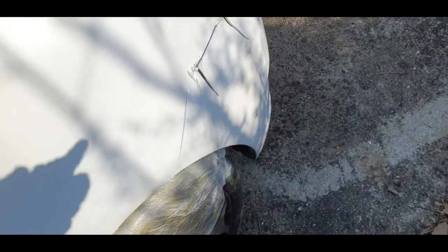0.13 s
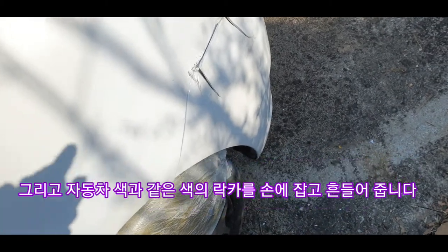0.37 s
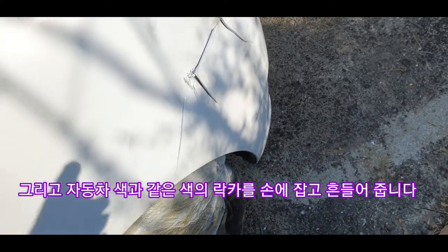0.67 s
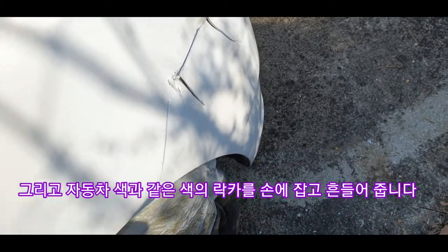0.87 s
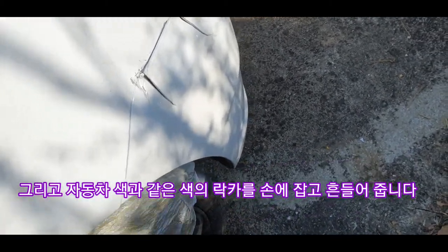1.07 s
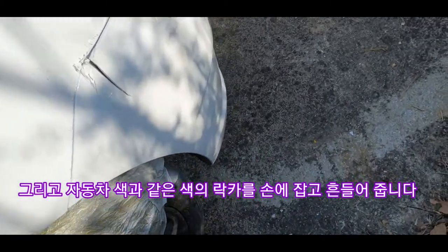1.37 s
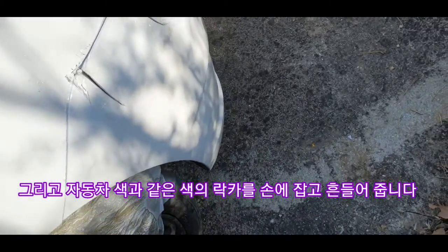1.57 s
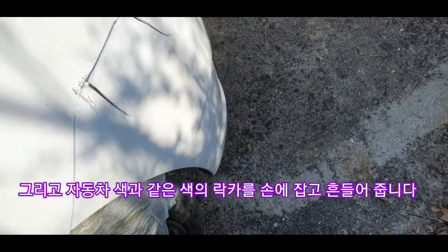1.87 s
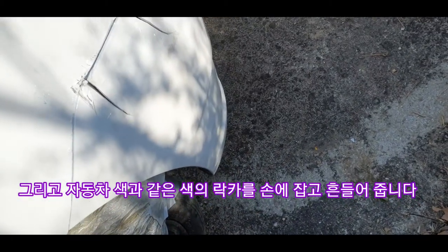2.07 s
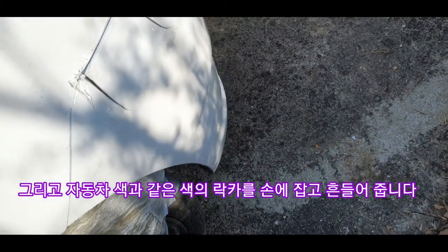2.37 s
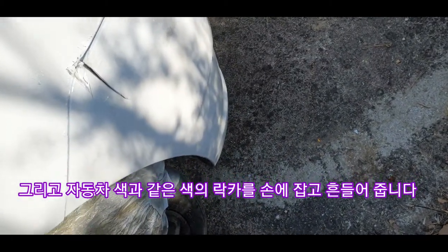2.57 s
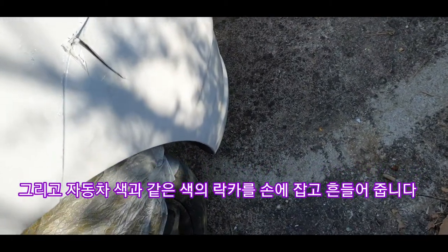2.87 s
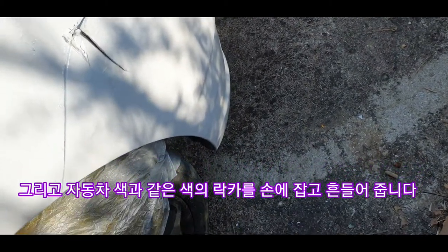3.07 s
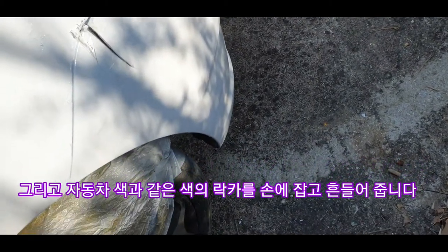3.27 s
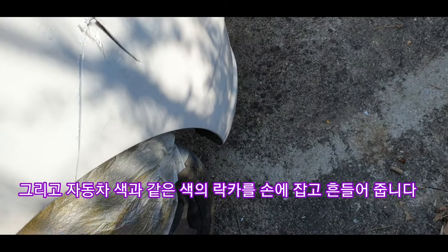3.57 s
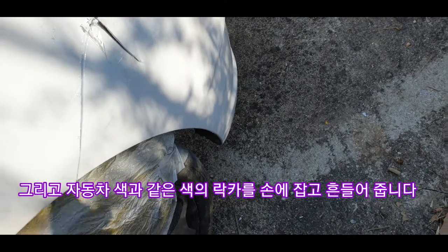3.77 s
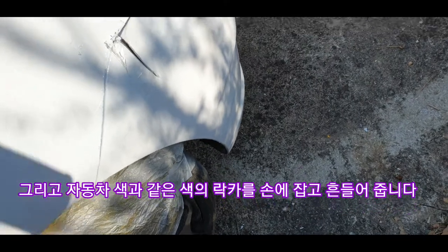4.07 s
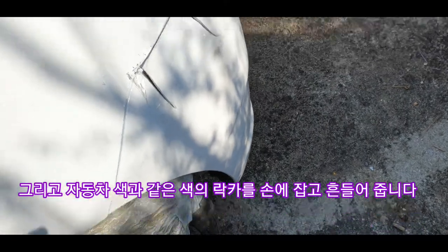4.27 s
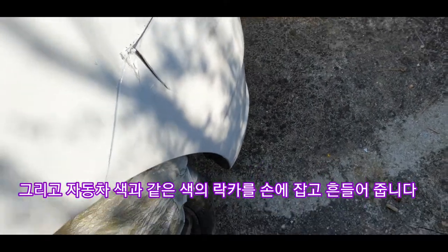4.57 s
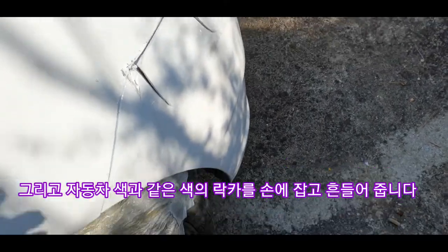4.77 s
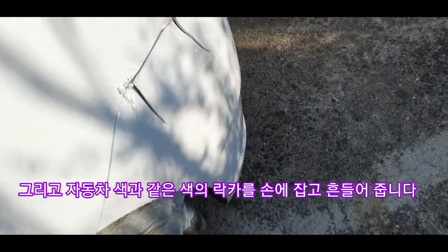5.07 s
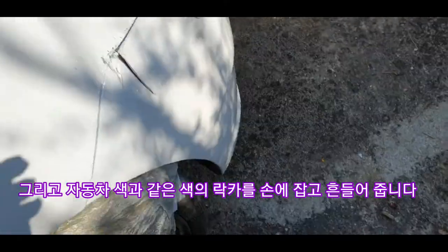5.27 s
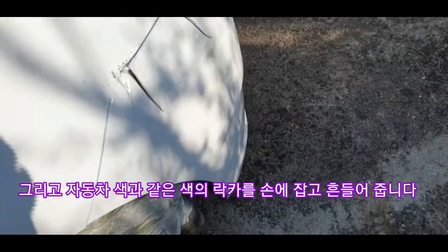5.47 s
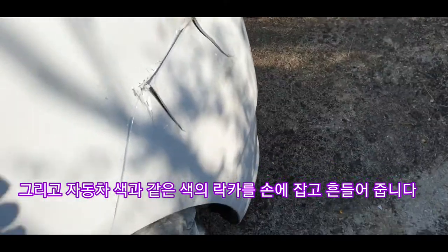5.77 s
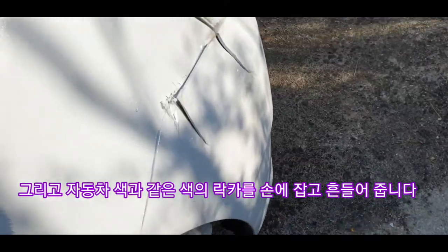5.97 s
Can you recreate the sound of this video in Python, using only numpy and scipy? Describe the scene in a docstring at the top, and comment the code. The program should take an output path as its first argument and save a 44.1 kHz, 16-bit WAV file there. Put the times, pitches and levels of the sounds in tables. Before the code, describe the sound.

A spray paint can is handled outdoors, close to the microphone and slightly to the right. For the first 1.4 seconds its mixing ball knocks loosely against the tin in scattered metallic clinks, the clearest at about 0.4 seconds. From 1.4 to 3.2 seconds come seven short, evenly paced sprays, each a bright hiss lasting a fifth of a second or less. After a brief lull, the can is shaken hard from about 3.9 seconds until the end, just past 6 seconds. The ball rattles in fast, uneven clusters of sharp clicks, louder than the sprays, with faint paint sloshing and sleeve rustle underneath. Wind buffets the microphone throughout as a low, uneven rumble with dull thumps, strongest near 2.9 and 4.5 seconds. The outdoor background is otherwise very quiet.

```python
"""Outdoors by a car panel, a spray paint can in the right hand. Its mixing ball knocks the tin,
seven short test sprays hiss from the nozzle and reflect off the panel, then the can is shaken hard.
Sleeve and paint rustle with the motion; gusts buffet and thump both microphone ports.
The right port faces the can; the left hears it later and duller."""
import sys
import numpy as np
from scipy import signal
from scipy.fft import rfft, irfft, next_fast_len
from scipy.io import wavfile
from scipy.ndimage import uniform_filter1d, map_coordinates

SR = 44100
rng = np.random.default_rng(int(sys.argv[2]) if len(sys.argv) > 2 else 0)


def output_pcm(signal):
    """Save a mono or channel-first signal as 16-bit PCM at the path in sys.argv[1].

    Samples are clipped to [-1, 1] before scaling.
    """
    pcm = np.clip(np.atleast_2d(signal).T, -1, 1) * 32767
    wavfile.write(sys.argv[1], SR, np.round(pcm).astype(np.int16))


N = 270244


def amp(db):
    return 10 ** (np.asarray(db) / 20)


def unit_rms(x):
    return x / np.sqrt(np.mean(x ** 2, axis=-1, keepdims=True) + 1e-20)


def at_hz(points, hz):
    """Interpolate (Hz, value) points on a log axis."""
    point_hz, values = np.transpose(points)
    return np.interp(np.log(hz + 1), np.log(point_hz + 1), values)


def curves(rows):
    """One value per sample for each column after the time."""
    times_s, *columns = np.transpose(rows)
    return [np.interp(np.arange(N) / SR, times_s, column) for column in columns]


def wobble(knots_per_s):
    """Smooth random curve, computed every 16 samples."""
    knots = rng.standard_normal(int(N * knots_per_s / SR) + 4)
    coarse = map_coordinates(knots, [np.arange(N // 16 + 2) * 16 * knots_per_s / SR])
    return np.interp(np.arange(N) / 16, np.arange(len(coarse)), coarse)


def tent_db(peak_s, rise_db_per_s, fall_db_per_s):
    """Level climbing to 0 dB at peak_s, then sinking."""
    t = np.arange(N) / SR - peak_s
    return np.where(t < 0, rise_db_per_s * t, -fall_db_per_s * t)


def steady(x, span_s):
    """Even out the level over span_s."""
    power = np.abs(uniform_filter1d(x ** 2, max(int(span_s * SR), 1)))
    return x / np.sqrt(power + 0.077)


def filtered(x, response):
    """Apply a gain given as a function of Hz."""
    size = next_fast_len(x.shape[-1] + 4096)
    spectrum = rfft(x, size) * response(np.fft.rfftfreq(size, 1 / SR))
    return irfft(spectrum, size)[..., :x.shape[-1]]


def sides(pan_db):
    """Left and right gains of mean power 1; pan is left over right."""
    gains = amp(np.array([pan_db, -pan_db]) / 2)
    return gains / np.sqrt(np.mean(gains ** 2, axis=0))


def hiss(spectrum, shared, grain_db, grain_per_s):
    """Stereo noise of rms 1, partly shared by the ports, with a grainy level."""
    common, own = rng.standard_normal(N), rng.standard_normal((2, N))
    white = np.sqrt(shared) * common + np.sqrt(1 - shared) * own
    grainy = white * amp(grain_db * wobble(grain_per_s))
    band = [(spectrum[0][0] * .8, -60), *spectrum, (spectrum[-1][0] * 1.02, -90)]
    return unit_rms(filtered(grainy, lambda hz: amp(at_hz(band, hz))))


# Outdoor air. Each row: frequency in Hz, level in dB.
AIR_SPECTRUM = [(150, -40), (250, -6.5), (287, -5.5), (330, -6), (372, -5.5), (1010, -20.5),
                (6030, -29.5), (7680, -28), (9610, -21.5), (15600, -31)]


def air():
    """Faint, steady background noise."""
    return amp(-74) * hiss(AIR_SPECTRUM, shared=.087, grain_db=.55, grain_per_s=21)


# Single gusts on a port. Each row: start in seconds, level in dB, ring in Hz, pan in dB,
# surrounding buffet in dB, sharp edge in dB.
GUSTS = [(1.239, -23, 61, -26, -21.5, -73), (1.421, -21, 81, 19, -48, -93),
         (2.104, -21, 65.5, -1, -33.5, -74), (2.696, -21.5, 62, -25, -30, -52.5),
         (2.893, -23, 75, 20, -48.5, -57.5), (2.922, -7.5, 75, -13, -34, -45),
         (3.132, -14.5, 99, -21, -59, -53), (3.41, -18.5, 70.5, 13, -38.5, -57.5),
         (4.264, -16.5, 117, -29, -36.5, -32.5), (4.356, -14.5, 69, -16.5, -47, -73),
         (4.483, -3, 63, -43, -31, -29), (4.684, -10, 102, -25.5, -34, -31.5),
         (4.726, -13, 81, -35, -47.5, -66), (4.858, -15.5, 83, -21, -36, -49.5),
         (5.743, -17, 73, -14, -37.5, -54.5)]


def thumps():
    """A pressure drop at the port swings back and dies in a few cycles; a sharp gust adds a slap."""
    ring_t60_s, slap_t60_s, slap_hz = .066, .03, 207
    out, t = np.zeros((2, N + SR)), np.arange(SR // 8) / SR
    slap = -np.sin(2 * np.pi * slap_hz * t) * amp(-60 * t / slap_t60_s)
    envelope = amp(-60 * t / ring_t60_s) * (1 - np.exp(-t / .0048))
    for start_s, level_db, ring_hz, pan_db, _, edge_db in GUSTS:
        swing = -np.sin(2 * np.pi * ring_hz * t + .18) * envelope
        thump = amp(level_db) * swing + amp(edge_db + 9) * slap
        out[:, round(start_s * SR):][:, :len(t)] += sides(pan_db)[:, None] * thump
    return filtered(out[:, :N], lambda hz: hz ** 2 / (hz ** 2 + 35 ** 2))


# Wind at the ports. Each row: time in seconds, buffet in dB, edge over buffet in dB, pan in dB.
BREEZE = [(0, -24.5, -26, -31), (.06, -46.5, -19, 4), (.27, -38, -20, -4), (.43, -43, -17.5, -12),
          (.6, -42, -22.5, 3.5), (.8, -48.5, -14, 10), (.95, -36.5, -20.5, 7), (1.1, -50.5, -12.5, 9),
          (1.38, -39, -7, -8.5), (1.5, -48, -9, 20), (1.65, -56, -19, 3), (1.91, -41.5, -20, -16.5),
          (2.2, -52, -7.5, 0), (2.32, -42, -17.5, 10), (2.6, -57, -15, 20), (2.75, -56, -5, -6),
          (3.17, -35, -13.5, -8.5), (3.46, -54.5, -23, 9.5), (3.64, -49.5, -26, 24.5), (3.76, -76, -5, 0),
          (3.88, -42, -29, -11), (4.03, -56.5, -23, -9), (4.3, -41.5, -14, -20.5), (4.7, -40, -12, -4.5),
          (4.95, -45.5, -14, -17), (5.22, -50.5, -12, 9), (5.44, -50.5, -20, 12), (5.51, -61.5, -16.5, -4),
          (5.75, -57, -9, 0), (5.92, -81, -18, -7), (5.99, -44, -20, -23), (6.13, -57, -6.5, -19)]
# Low buffet and its sharp edge. Each row: frequency in Hz, level in dB.
BUFFET_SPECTRUM = [(12, -57), (20, -18.5), (45, 7), (65, 1), (97, -3.5), (160, -24.5), (210, -62),
                   (350, -120)]
EDGE_SPECTRUM = [(90, -30.5), (140, 7.5), (200, -4), (300, -14.5), (450, -27), (700, -61.5)]


def wind():
    """Wind strikes each port in separate lumps and swells round every thump; a sharper edge rides on it."""
    level_db, sharpness_db, pan_db = curves(BREEZE)
    lumps = np.array([wobble(22), wobble(24)])
    buffet = amp(3.8 * lumps) * hiss(BUFFET_SPECTRUM, shared=.039, grain_db=.84, grain_per_s=34)
    edge = amp(6.6 * lumps) * hiss(EDGE_SPECTRUM, shared=.047, grain_db=4.4, grain_per_s=60)
    buffet = steady(unit_rms(buffet), span_s=.16)
    edge = steady(unit_rms(edge), span_s=.048)
    veer_db = 11 * wobble(6.1)
    out = amp(level_db + 4.5) * sides(pan_db + veer_db) * (buffet + amp(sharpness_db) * edge)
    for start_s, _, _, gust_pan_db, buffet_db, edge_db in GUSTS:
        span = slice(round((start_s - .15) * SR), round((start_s + .15) * SR))
        swell = amp(tent_db(start_s + .012, 258, 258)[span]) * sides(gust_pan_db)[:, None]
        out[:, span] += swell * (amp(buffet_db) * buffet[:, span] + amp(edge_db) * edge[:, span])
    return filtered(out, lambda hz: hz ** 4 / (hz ** 4 + 38 ** 4))  # the ports pass no slow pressure


# Sleeve rustle. Each row: time in seconds, fine layer in dB, coarse layer in dB.
SLEEVE = [(0, -80, -99), (.33, -87, -86), (.66, -96, -108), (1.08, -76, -89), (1.34, -74, -79),
          (1.7, -84, -82), (3.3, -85.5, -81), (3.72, -97, -94), (3.82, -65, -64.5), (4.08, -89, -66.5),
          (4.45, -81, -68.5), (4.93, -78, -71), (5.2, -77.5, -70), (5.47, -77, -72), (5.63, -56, -59.5),
          (5.8, -61, -58), (5.84, -70, -61), (5.92, -71.5, -72.5), (6.13, -66, -57.5)]
# Paint sloshes. Each row: peak in seconds, fine in dB, coarse in dB, rise in dB/s, fall in dB/s.
PAINT_SLOSHES = [(.114, -77, -68, 111, 163), (.375, -66.5, -64.5, 895, 40), (.705, -63.5, -65.5, 900, 112),
                 (.88, -74, -71, 700, 40), (1.223, -67, -68.5, 300, 121), (3.901, -65, -65, 257, 100),
                 (3.981, -56.5, -72, 330, 291), (4.135, -64.5, -59, 352, 35), (4.224, -59.5, -46, 266, 312),
                 (4.6, -49, -45, 264, 342), (4.705, -68, -64.5, 400, 70), (4.83, -84, -124, 311, 119.5),
                 (5.035, -60.5, -56, 298, 106), (5.579, -49.5, -68, 437, 354.5),
                 (5.779, -51, -51, 194, 471), (6.05, -47.5, -48.5, 413.5, 176)]
# The two rustle layers. Each row: frequency in Hz, level in dB.
FINE_SPECTRUM = [(2940, -40), (5000, -9.5), (6310, -8), (7600, -8.5), (11000, -2.5), (12500, -11),
                 (14600, -10.5), (15600, -8.5)]
COARSE_SPECTRUM = [(290, -33), (500, -2.5), (1550, -1), (2170, -3), (2580, 1), (3150, 1.5), (6000, -11.5),
                   (7800, -16.5), (13200, -120)]


def rustle():
    """Cloth, sloshing paint and the valve's leak after each spray: fine and coarse grainy noise."""
    leak_rise_db_per_s, flicker_db = 598, 4.5
    crackles_per_s, crackle_db, crackle_t60_s = 12, 8, .006
    leaks = [(start_s + open_s + .5 * SHUT_S, leak_db, leak_db - 2.5, leak_rise_db_per_s, fall)
             for start_s, open_s, _, _, leak_db, fall in TEST_SPRAYS]
    power = amp(curves(SLEEVE)) ** 2
    for peak_s, fine_db, coarse_db, rise, fall in list(PAINT_SLOSHES) + leaks:
        span = slice(max(round((peak_s - .3) * SR), 0), round((peak_s + .6) * SR))
        swell = amp(tent_db(peak_s, rise, fall)[span])
        power[:, span] += (swell * amp([[fine_db], [coarse_db]])) ** 2
    fine_gain, coarse_gain = np.sqrt(power) * amp(flicker_db * np.array([wobble(33), wobble(30)]))
    impulses = (rng.random(N) < crackles_per_s / SR) * rng.exponential(size=N)
    cloth_crackles = signal.lfilter([1], [1, -amp(-60 / crackle_t60_s / SR)], impulses)
    fine_gain *= 1 + amp(crackle_db) * cloth_crackles
    fine = fine_gain * hiss(FINE_SPECTRUM, shared=.065, grain_db=1.8, grain_per_s=420)
    coarse = coarse_gain * hiss(COARSE_SPECTRUM, shared=.43, grain_db=1.8, grain_per_s=180)
    return amp(7.5) * sides(-2.5)[:, None] * fine + amp(3.1) * sides(-2.8)[:, None] * coarse


# Path via the car panel. Each row: time in seconds, left delay in ms, right delay in ms.
PANEL_DELAYS = [(1.48, 1.7, 2.47), (1.8, 1.72, 2.5), (2.3, 1.64, 2.36), (2.62, 1.59, 2.25),
                (2.88, 1.52, 2.18), (3.13, 1.5, 2.15)]


def panel_echo(direct):
    """The car panel sends the spray back, weaker and with a drifting delay."""
    delay_ms = np.array(curves(PANEL_DELAYS)) + .012 * wobble(8)
    positions = np.arange(N) - delay_ms * SR / 1000
    echo = np.array([map_coordinates(side, [at], order=2) for side, at in zip(direct, positions)])
    return amp([[-3.5], [-7]]) * echo


# Valve presses. Each row: start in seconds, time open in seconds, jet in dB, pan in dB,
# leak after shutting in dB, its fall in dB/s.
TEST_SPRAYS = [(1.366, 0.2, -32, -3.5, -65, 155), (1.706, 0.17, -33.5, -5, -62.5, 190),
               (1.956, 0.14, -33.5, -5, -66.5, 174), (2.176, 0.22, -33.5, -5, -64, 170),
               (2.528, 0.16, -33.5, -3.5, -61, 91.5), (2.802, 0.14, -33.5, -2, -61.5, 114),
               (3.055, 0.14, -33.5, -1.5, -60.5, 235)]
# Nozzle jet and lower hiss. Each row: frequency in Hz, level in dB.
JET_SPECTRUM = [(2940, -47), (5000, -13), (5220, -10.5), (5820, -12), (6370, -8.5), (7780, -8.5),
                (9070, -0.5), (10800, 1.5), (11900, 0), (13100, -2.5), (15600, -1)]
SPLUTTER_SPECTRUM = [(650, -8), (900, -8.5), (1300, -8), (2100, 3), (3000, 2), (4200, 0.5), (5500, 0),
                     (6500, -8.5)]
OPENING_S, FILL_S, SHUT_S, SAG_DB_PER_S = .014, .017, .026, 24


def spray():
    """The bright jet jumps up, fills, sags and shuts; a spluttering lower hiss gains on it at shut-off."""
    jet = hiss(JET_SPECTRUM, shared=.8, grain_db=1.4, grain_per_s=150)
    splutter = hiss(SPLUTTER_SPECTRUM, shared=.93, grain_db=2, grain_per_s=120)
    splutter *= amp(2 * wobble(24.95))
    out, samples = np.zeros((2, N)), np.arange(N)
    for start_s, open_s, level_db, pan_db, *_ in TEST_SPRAYS:
        late_s = .75 * open_s
        # Valve stages: cracked, open, full, late, closing, shut.
        stages_s = start_s + np.array([0, OPENING_S, OPENING_S + FILL_S, late_s, open_s, open_s + SHUT_S])
        stages_db = -30.5, -5.5, 0, -.4 * SAG_DB_PER_S * late_s, -SAG_DB_PER_S * open_s, -43.5
        stages_splutter_db = -25, -18, -15, -18.5, -14, 4
        envelope_db, splutter_db = curves(np.transpose([stages_s, stages_db, stages_splutter_db]))
        flowing = (samples > stages_s[0] * SR) & (samples < stages_s[-1] * SR)
        bright = amp(2.5) * sides(pan_db)[:, None] * jet
        low = amp(splutter_db + 2.2) * sides(.45 * pan_db)[:, None] * splutter
        out += flowing * amp(envelope_db + level_db) * (bright + low)
    return out + panel_echo(out)


# Ball strikes. Each row: start in seconds, level in dB, pitch of the struck spot in Hz, then hollow
# ring, upper wall and treble in dB against the body, pan in dB, rattle tail in dB.
BALL_STRIKES = [(0.045, -43.5, 2130, -28, 3, -10, -8, -5.5), (0.09, -49, 2060, -41, -27, -25, -6, -5.5),
                (0.1082, -37, 2040, -39, -4, -23, -6, -5.5), (0.3597, -17.5, 3500, -25, 7, 3, -2.5, 5.5),
                (0.4756, -23.5, 1676, -11.5, -3.5, -2.5, -4.5, 3),
                (0.6916, -33.5, 2250, -23, -0.5, 15, -4, 2), (0.8661, -38.5, 1830, -16, 1.5, 15, -5.5, 2),
                (0.9156, -46.5, 4130, -43, -5, 18, -4, -11), (1.132, -67, 2670, -6, -17, 30.5, -9, -15),
                (1.2072, -39, 4140, -9, 11.5, 30, -2, -1), (1.3725, -34, 5360, -14, 0, -5, 1, 0),
                (3.8849, -22.5, 2330, -2, 1, -8, -6.5, 9.5), (3.911, -25, 1900, -5.5, 0, 0, -4.0, 4),
                (3.9613, -19.5, 2470, -12.5, -7, 5.5, -4, 3.5),
                (3.988, -20.5, 1830, -16, 3.5, 7.5, -11, 3.5), (4.004, -30, 2670, -35, -29, -22, -2, 7),
                (4.064, -28, 1820, -9.5, 2, 2, -8, -4), (4.117, -34, 1910, -36, -21, -20, 1, -9),
                (4.1263, -36, 1960, -20, -13, -19, -15, 10), (4.182, -23.5, 1430, -9, 0.5, -1, -9, -17),
                (4.1872, -26.5, 1670, -20, -4, -2, -10, 4.5), (4.2052, -8, 5660, -46, -0.5, 0, -8, -7),
                (4.2178, -11.5, 1800, -47, -10.5, -8.5, 0, 5.5), (4.223, -17.5, 2100, -35, -19, 2, -6, 0),
                (4.2307, -16.5, 4460, -21, -21, 4.5, -7, -8), (4.2345, -14, 2170, -19, 0.5, -5, -3.5, 3.5),
                (4.2468, -24.5, 2380, -5.5, -7, -9, 2, 6), (4.2802, -71, 2440, 3, 14, 39, -20.0, -11),
                (4.3072, -4, 2510, -11, -15.5, -10, -2, -5), (4.4076, -38, 1640, -37, 3, 3, -5, -13),
                (4.4191, -28.5, 3370, -35, -3, 0, -8, -10), (4.4333, -17.5, 2840, -33, -7.5, -2.5, -4, 0),
                (4.4721, -29, 1570, -28, -12, -17, -5, 0), (4.5075, -37, 1810, -12, -13, -19, -9, 7.5),
                (4.576, -14, 5670, -56, -7.5, 3, -1, -20), (4.5859, -10.5, 5670, -47, 0.5, -3, -14, -4.5),
                (4.5976, -27, 2110, -36, 5, -6, -3.5, 10), (4.606, -23, 2300, -37, -4, -17, 2, 3),
                (4.6126, -24, 4050, -31, -1, -18, -3.0, -5.5), (4.62, -28, 1840, -10, -10.5, -10, -12, 11),
                (4.6317, -29, 1830, -8, -15, -14, 2, 13.5), (4.6926, -11, 2380, -13.5, -10, -8.5, -1, 0.5),
                (4.7237, -40, 2270, -21, -15, -10, 6, 2), (4.766, -24, 1470, -18, -5, -3, -2.5, -2.5),
                (4.814, -27, 4200, -23, -1, 1, -2, -7), (4.827, -17.5, 1990, -15.5, -1.5, 3.5, -14, -14),
                (4.8319, -25, 1520, -31, -10, -8, 14, 2), (4.8644, -26, 1750, -18, -2, -6, -11, -8),
                (4.9024, -31, 1810, -44, -10, -14, -6, -13), (4.9448, -31.5, 1750, -21, -12, -33, -6, -15),
                (4.962, -37.5, 1480, -11, -26, -20, -7.0, 12), (5.014, -27.5, 2140, -39, -4, -29, -10, -7),
                (5.024, -15.5, 2300, -58, 3, 2.5, -7, 3), (5.0354, -35, 2540, -40, -4, -14, 0, 13),
                (5.0779, -19, 2700, -13, -4.5, -4, -7, 4.5), (5.0833, -20, 2620, -37, -12, -8, 5, -1),
                (5.1625, -39, 1480, -8, -8, -16, -2, -5.5), (5.186, -11.5, 2640, -16, -16.5, -12.5, -5, -3),
                (5.3233, -34.5, 2500, -7.5, 2, 11.5, -6, -14), (5.3518, -39.5, 1430, -34, -4, -4, -8.5, -1),
                (5.384, -45, 1990, -42, -12, -8, -32, 3), (5.3916, -15, 3660, -27, -6, -4, -10, -6),
                (5.5064, -39.5, 1480, -6, -9, -6, -1.5, 6), (5.5396, -15, 2250, -8.5, 2, -3, -9.5, -10),
                (5.557, -11.5, 2770, -52, -5, -6, -7, 0), (5.5654, -24, 1810, -10, -8, -2, -5, -5.5),
                (5.573, -13, 2730, -42, -3, 6, -0.5, -11), (5.585, -16.5, 1700, -19, -2.5, 7.5, -8, -3),
                (5.5968, -18, 1530, -36, -13, -12, -4, 5.5), (5.673, -12, 2470, -12.5, -29, -16.5, -1, 8),
                (5.6829, -31.5, 1890, -31, -16, -10, -1.5, 10), (5.7783, -38, 1320, -22, -5, 5, 9, 4),
                (5.821, -37, 2740, -21, -13, -16, 3, -5.5), (5.8357, -15, 1980, -21.5, -9.5, -8, -7.5, -8),
                (6.0016, -39, 2600, -19, -9, -2, -7, 0), (6.0184, -11, 2070, -44, 3.5, 2, -4.5, -2.5),
                (6.0403, -11, 1590, -29, -11, -14, -7, -16), (6.0519, -19, 2560, -36, -9, 6, -22, 3),
                (6.0595, -16.5, 2440, -40, -5, 7.5, -3.5, -5.5),
                (6.0652, -21.5, 2320, -32, -8, -26, -12, 0), (6.075, -31, 2380, -8, -14, -18, 3, -8)]
# Tin modes, damped by paint and hand. Each row: frequency in Hz, level in dB, t60 in seconds.
TIN_MODES = [(760, -5, 0.028), (950, -5, 0.015), (1516, 0.5, 0.0059), (1831, -5.5, .012), (2102, 0, 0.0081),
             (2392, -0.5, 0.0077), (2751, -0.5, 0.0091), (3362, 5, 0.0066), (3744, 3.5, 0.0043),
             (4150, -7, 0.0089), (5683, 3.5, 0.0052), (7340, -1, 0.0065), (9560, 10.5, 0.003),
             (11400, 3, 0.0044), (13300, -1, .0035)]
# Looseness of the hand. Each row: time in seconds, ring time against a firm grip in dB.
GRIP_LOOSENESS = [(0, 18.5), (1.25, 4.5), (1.37, -10), (3.88, 10.5), (4.15, -1.5), (6.13, 1.8)]
# Decay of the rattle tail. Each row: frequency in Hz, t60 in seconds.
TAIL_DECAY = [(500, 0.01), (1500, 0.087), (3500, 0.029), (9000, 0.018), (15000, 0.011)]
# Colour of the rattle tail. Each row: frequency in Hz, level in dB.
TAIL_SPECTRUM = [(300, -30.5), (800, -11), (2200, -19.5), (4500, 1), (7500, -3.5), (10500, 4), (15000, 0)]


def ball_knocks():
    """The ball rings the tin's modes near the struck spot, ticks, snaps and leaves a short rattle."""
    mode_scatter_db, port_scatter_db, swing_s = 1.3, 2.5, .00003
    tick_t60_s, snap_t60_s = .0019, .0018
    out, t = np.zeros((2, N + SR)), np.arange(2560) / SR
    mode_hz, mode_db, mode_t60_s = np.transpose(TIN_MODES)[:, :, None]
    above_hollow = mode_hz > 1200
    in_body = above_hollow & (mode_hz < 6500)
    bin_hz, frame_s = np.fft.rfftfreq(128, 1 / SR)[:, None], np.arange(41) * 64 / SR
    tail_fade = amp(at_hz(TAIL_SPECTRUM, bin_hz) - 60 * frame_s / at_hz(TAIL_DECAY, bin_hz))
    tail_fade *= frame_s > 0
    tail_rise = 1 - np.exp(-(t / .0029) ** 2)
    contact_rise = 1 - np.exp(-(t / .00032) ** 2)
    for start_s, level_db, spot_hz, hollow_db, wall_db, treble_db, pan_db, tail_db in BALL_STRIKES:
        colour = [(900, hollow_db), (1500, 0), (2800, 0),
                  (3600, wall_db), (6000, wall_db), (8000, treble_db)]
        drive_db = np.maximum(-30 * np.abs(np.log2(mode_hz / spot_hz)), -8) * above_hollow
        # A looser grip lets the driven modes ring on.
        loose_db = np.interp(start_s, *np.transpose(GRIP_LOOSENESS))
        t60_s = mode_t60_s * amp(loose_db * amp(.5 * drive_db) * np.where(above_hollow, 1, .6))
        detune, phase_shift, scatter = rng.standard_normal((3, len(TIN_MODES), 1))
        phase = 2 * np.pi * mode_hz * (1 + .02 * detune) * t + .45 * phase_shift
        struck_db = mode_db + at_hz(colour, mode_hz) + drive_db + mode_scatter_db * scatter
        modes = contact_rise * amp(struck_db - 60 * t / t60_s) * np.sin(phase)
        body_peak = np.abs(np.sum(modes * in_body, axis=0)).max()
        tick = contact_rise * amp(treble_db + .5 - 60 * t / tick_t60_s) * rng.standard_normal(len(t))
        snap = body_peak * amp(-5.5 - 60 * t / snap_t60_s) * np.sin(2 * np.pi * spot_hz * t)
        noise_frames = signal.stft(rng.standard_normal((2, len(t))), nperseg=128)[2]
        tail_frames = noise_frames * tail_fade * amp(at_hz(colour, bin_hz))
        tail = signal.istft(tail_frames, nperseg=128)[1][:, :len(t)]
        ring = amp(port_scatter_db * rng.standard_normal((2, len(TIN_MODES)))) @ modes
        knock = ring + tick + snap + amp(tail_db) * tail_rise * tail
        knock *= amp(level_db + 1) * sides(pan_db)[:, None] / body_peak
        left_s = start_s + rng.normal(0, swing_s)  # the swinging can shifts the left arrival
        out[0, round(left_s * SR):][:len(t)] += knock[0]
        out[1, round(start_s * SR):][:len(t)] += knock[1]
    # The knocks carry little bass.
    return filtered(out[:, :N], lambda hz: (1j * hz / (1j * hz + 230)) ** 2)


# Shading of the left port. Each row: frequency in Hz, gain against the right in dB.
LEFT_SHADOW = [(500, 1.5), (2500, -4), (5000, 1), (9000, -3.5), (15000, 0.5)]
LEFT_LAG_S = .000476


def scene():
    """The can reaches the left port late and shaded; wind and air are added at both ports."""
    left, right = ball_knocks() + spray() + rustle()
    left = filtered(left, lambda hz: amp(at_hz(LEFT_SHADOW, hz)) * np.exp(-2j * np.pi * hz * LEFT_LAG_S))
    return np.array([left, right]) + wind() + thumps() + air()


def record(dry):
    """Peaks round off near full scale; the top end steps down, then stops at the band limit."""
    ceiling, shelf_hz, limit_hz = .95, 15650, 16900

    def below(hz, edge_hz):
        return .5 - .5 * np.tanh(np.clip((hz - edge_hz) / 60, -20, 20))

    def top_end(hz):
        return (below(hz, shelf_hz) + amp(-24)) * below(hz, limit_hz - 250) * (hz < limit_hz)

    rounded = dry / (1 + np.abs(dry / ceiling) ** 8) ** (1 / 8)
    return filtered(rounded, top_end)


dry = scene()
out = record(dry)
output_pcm(out)
```